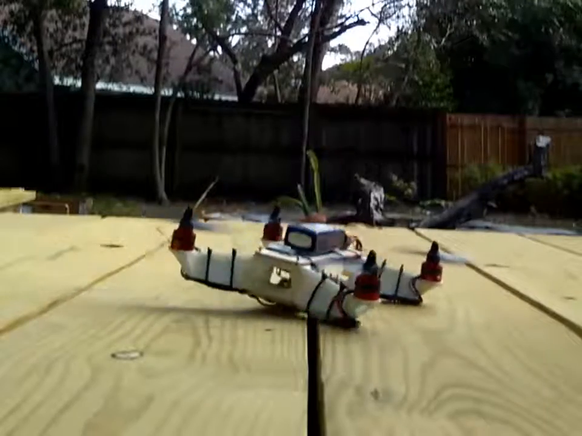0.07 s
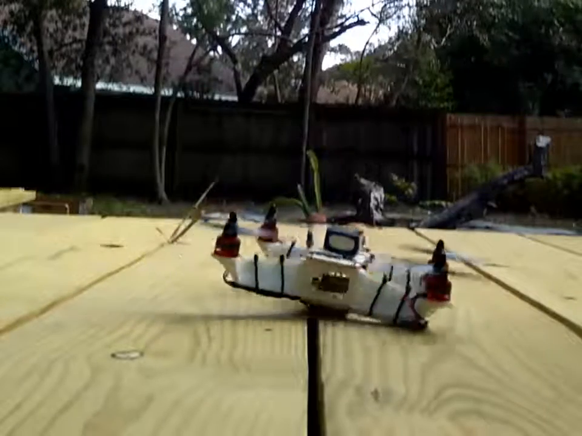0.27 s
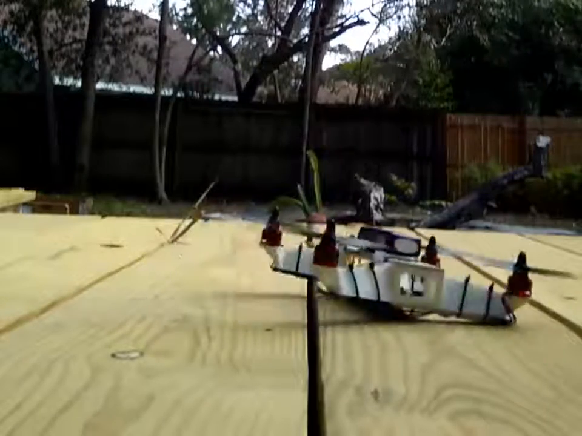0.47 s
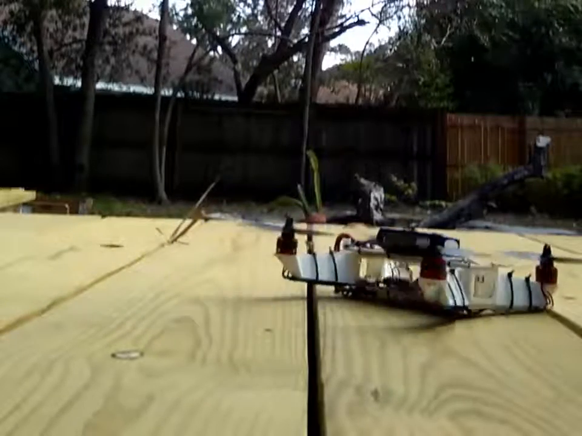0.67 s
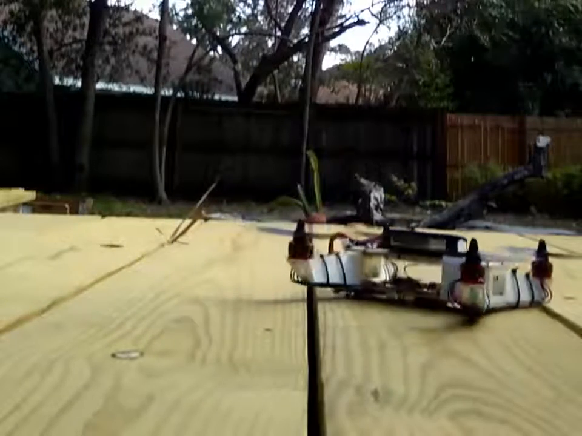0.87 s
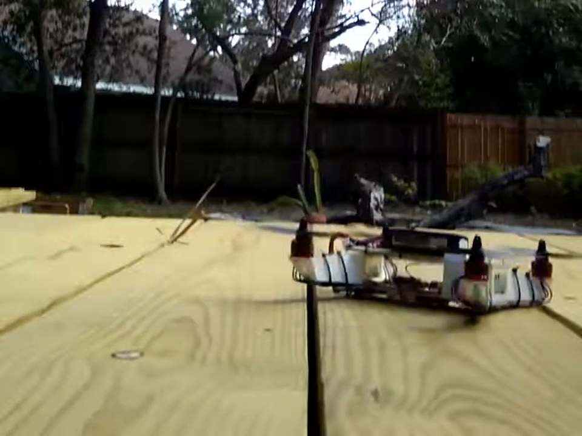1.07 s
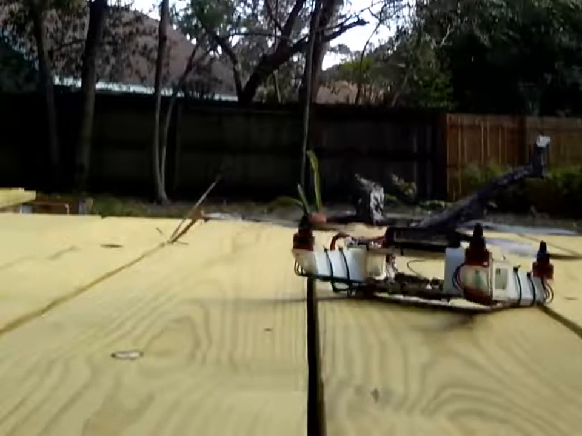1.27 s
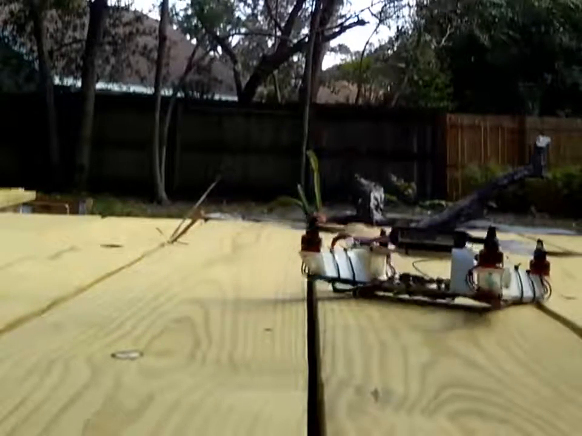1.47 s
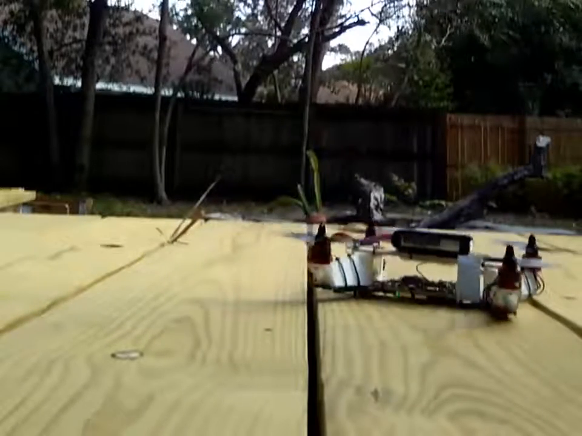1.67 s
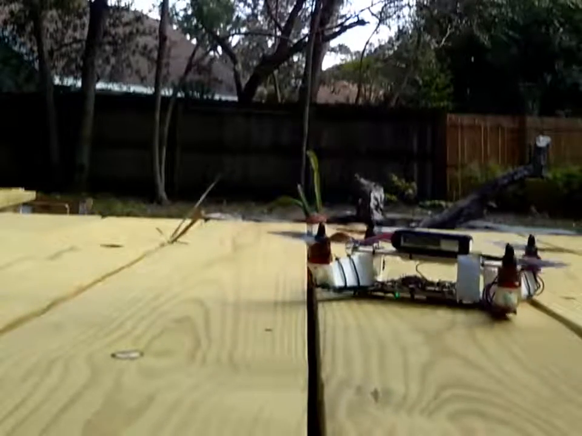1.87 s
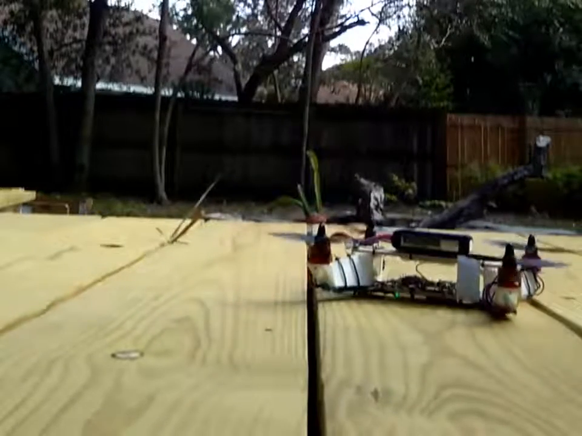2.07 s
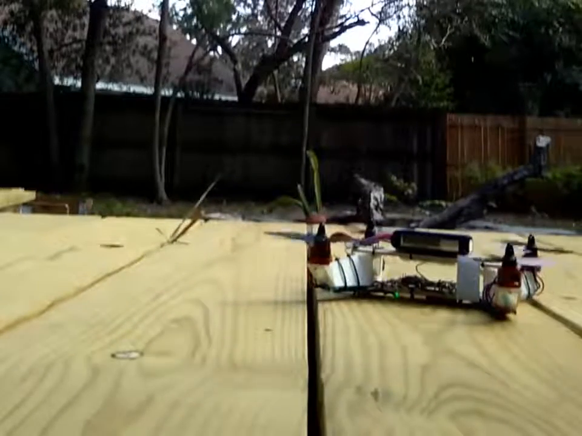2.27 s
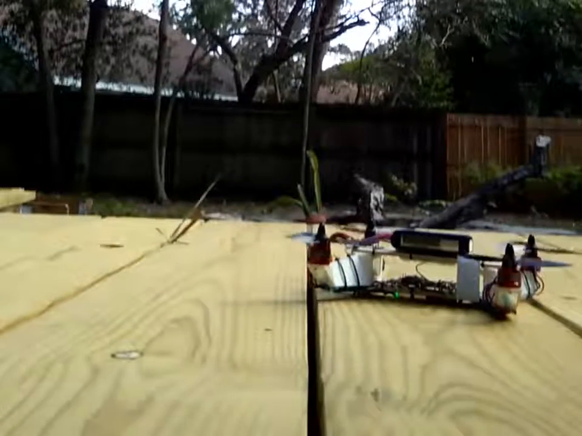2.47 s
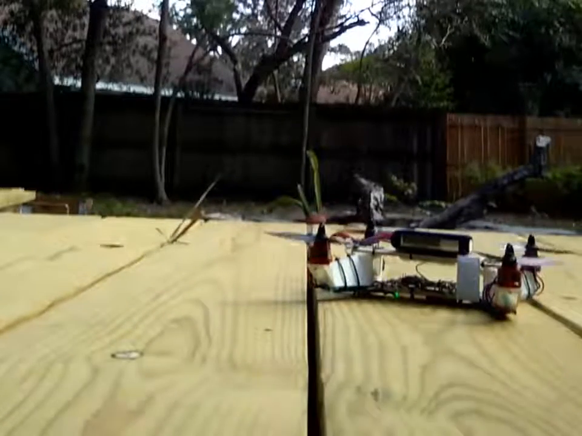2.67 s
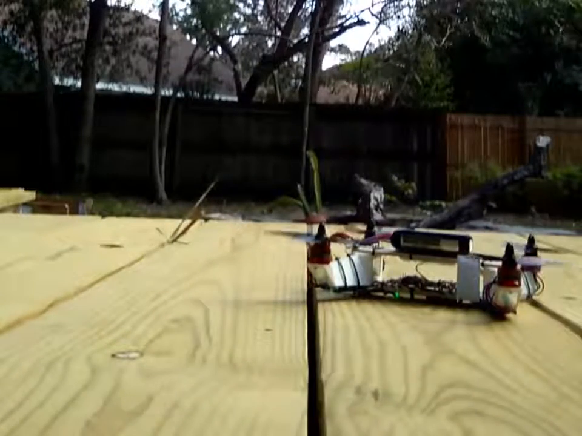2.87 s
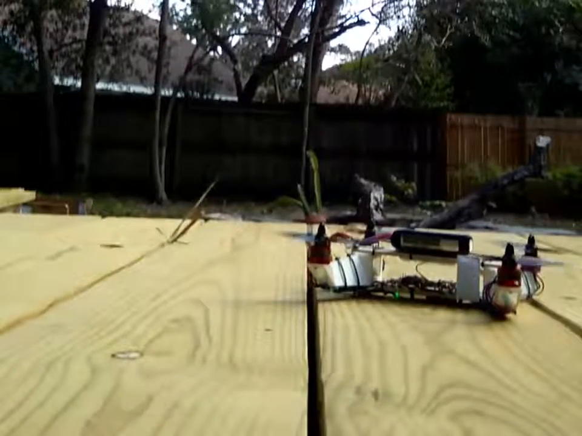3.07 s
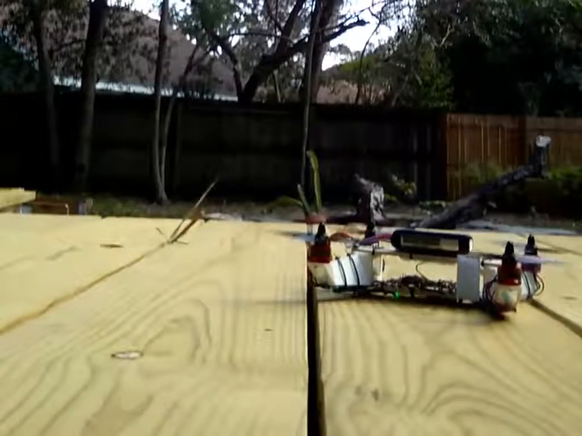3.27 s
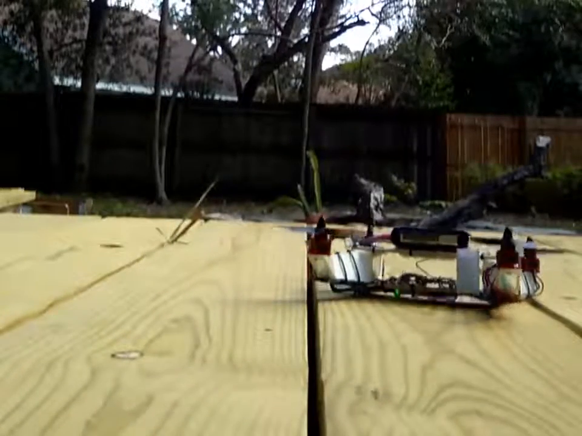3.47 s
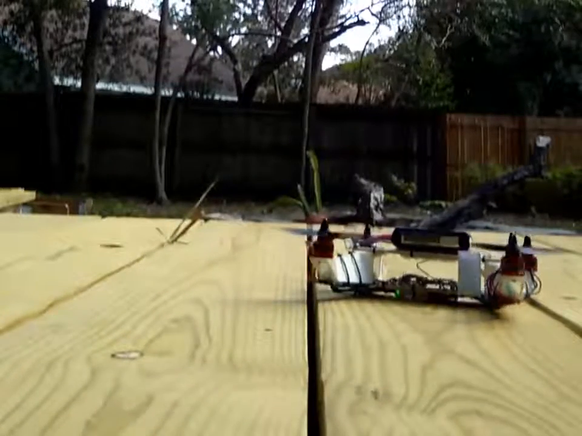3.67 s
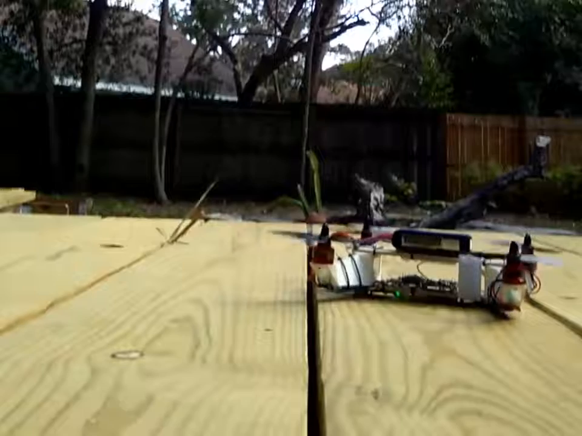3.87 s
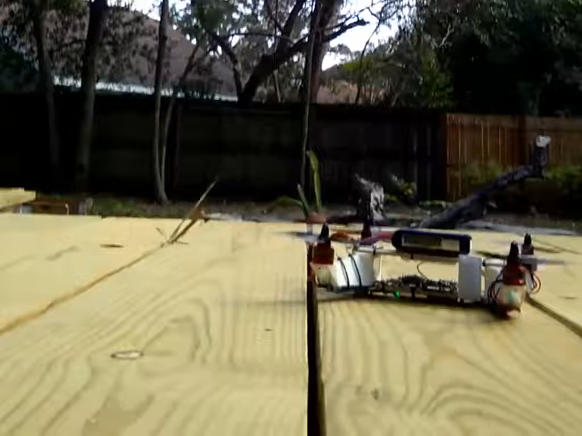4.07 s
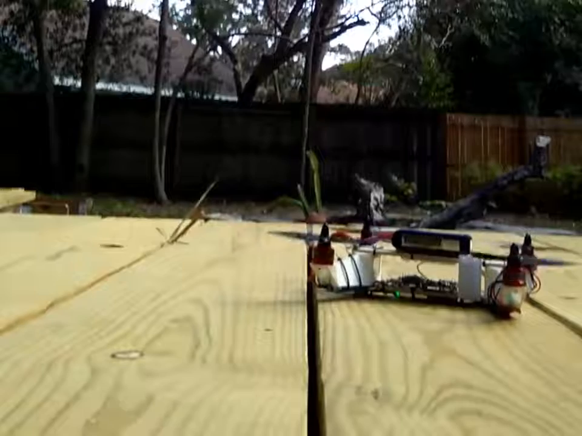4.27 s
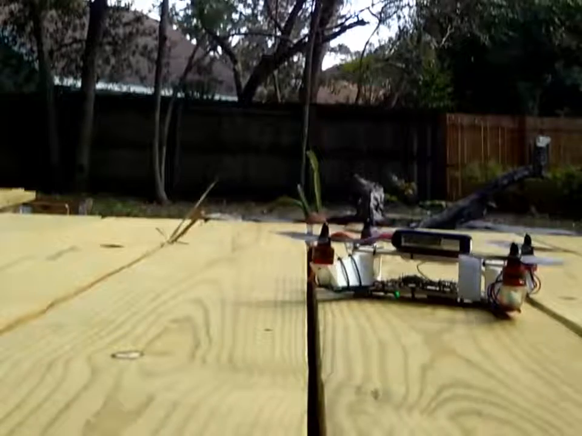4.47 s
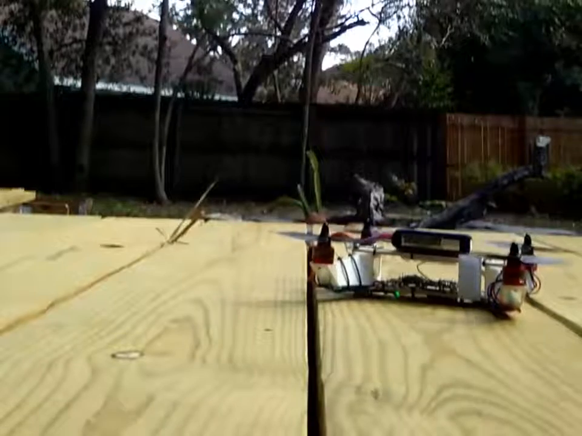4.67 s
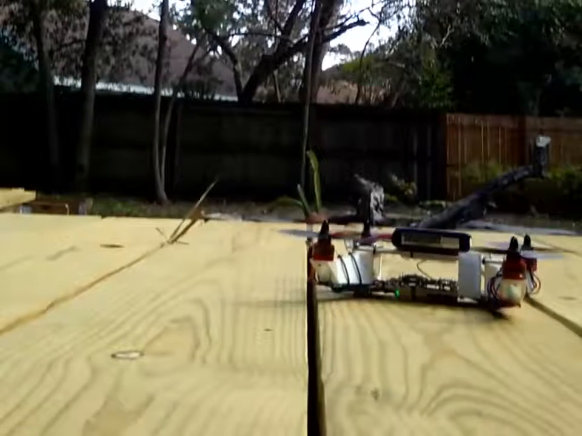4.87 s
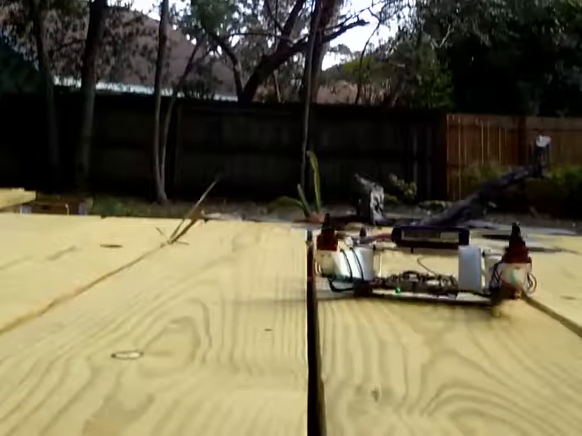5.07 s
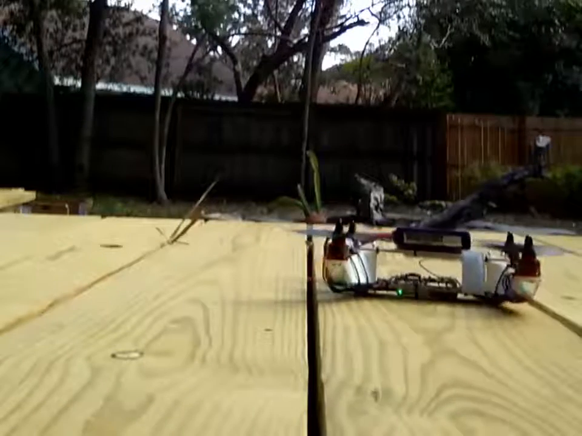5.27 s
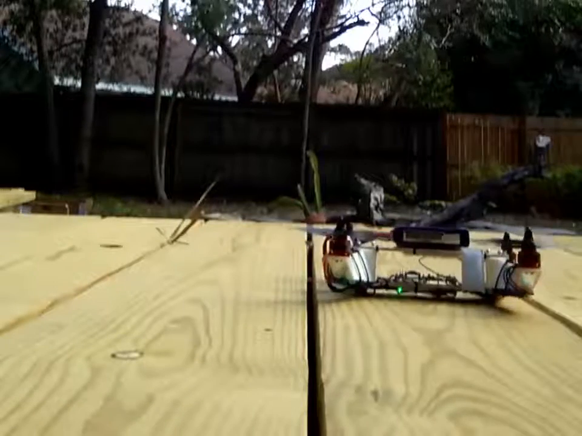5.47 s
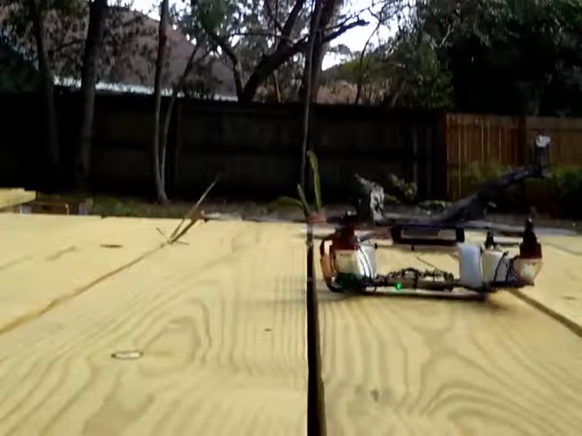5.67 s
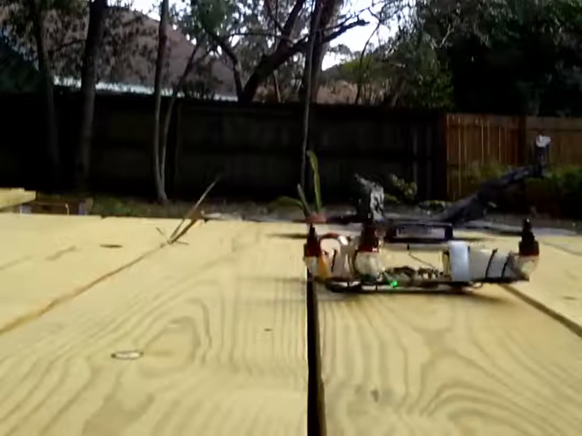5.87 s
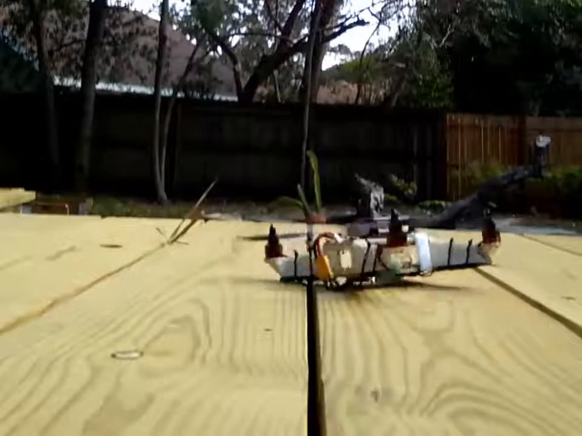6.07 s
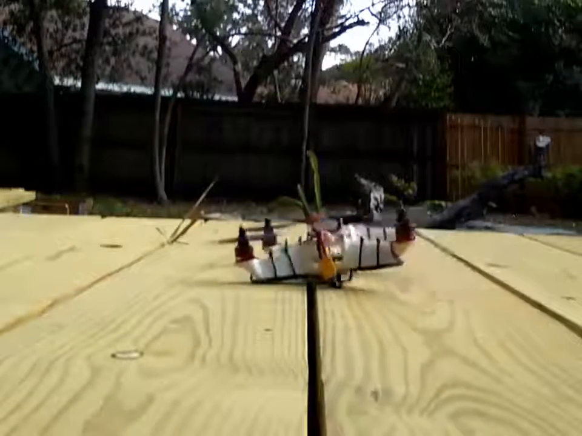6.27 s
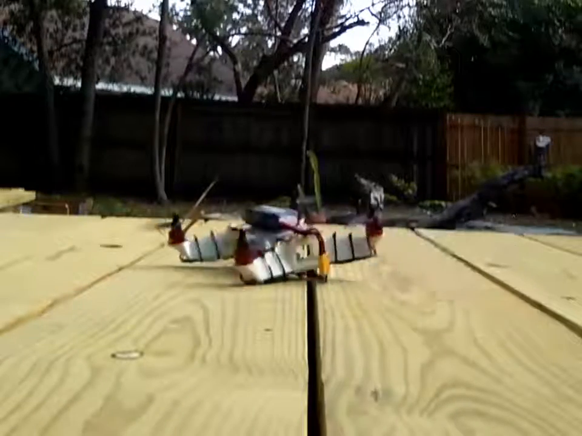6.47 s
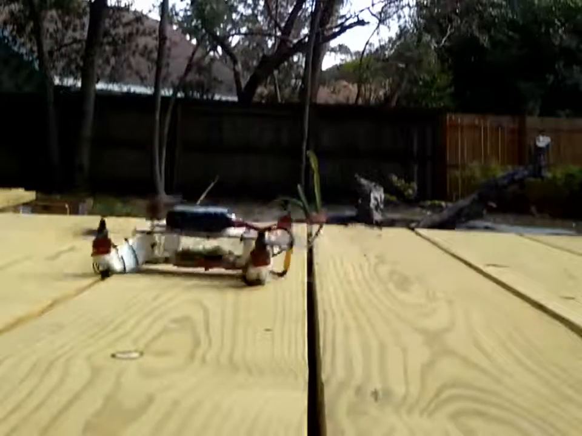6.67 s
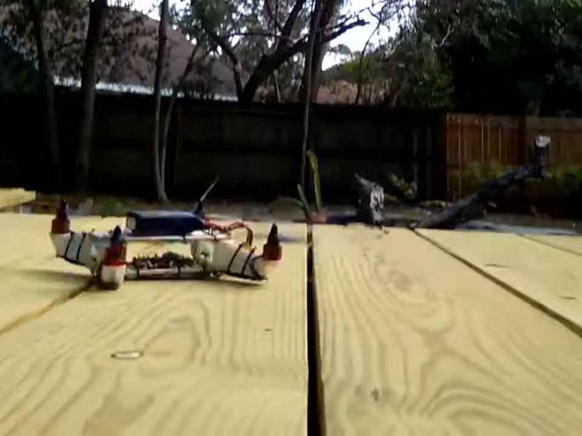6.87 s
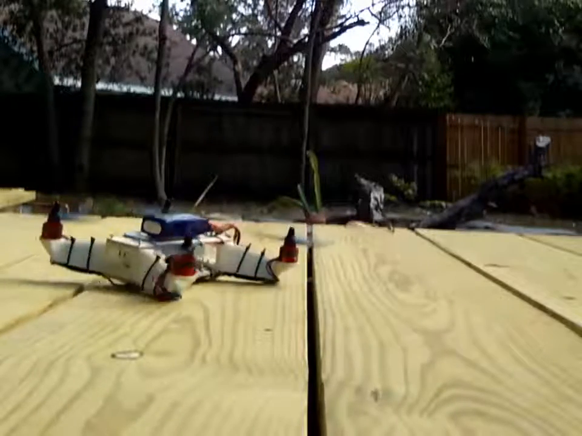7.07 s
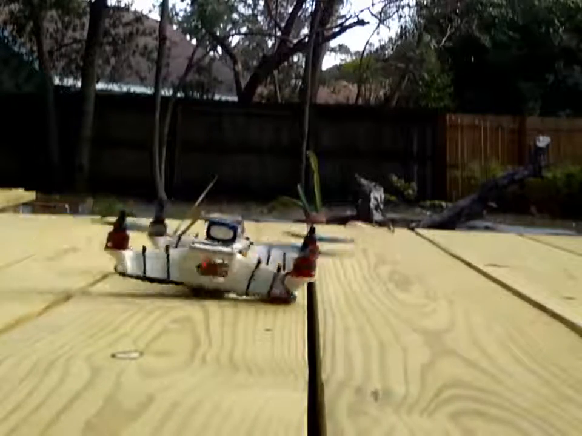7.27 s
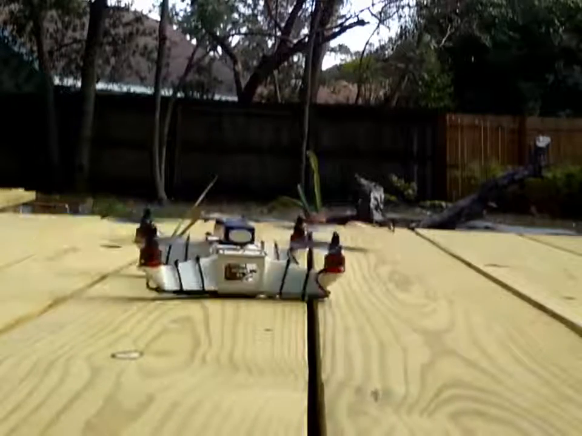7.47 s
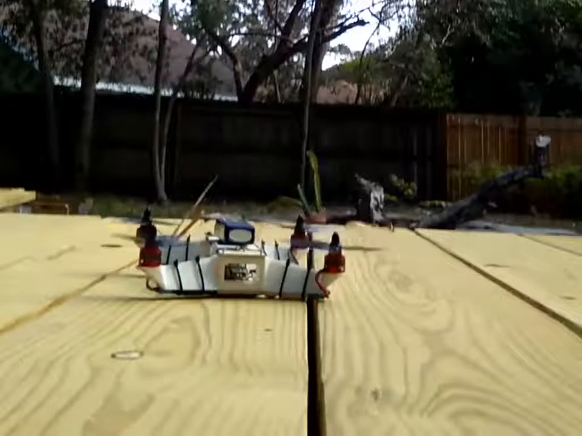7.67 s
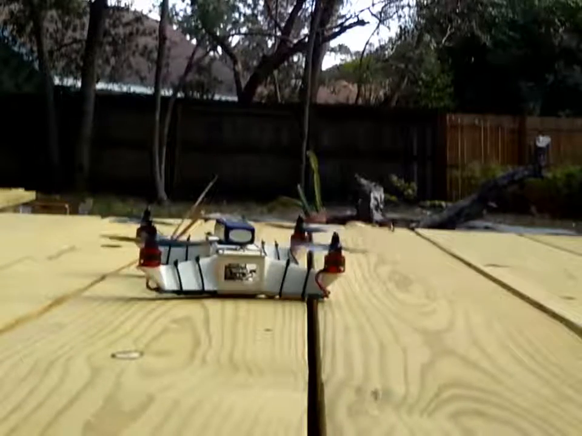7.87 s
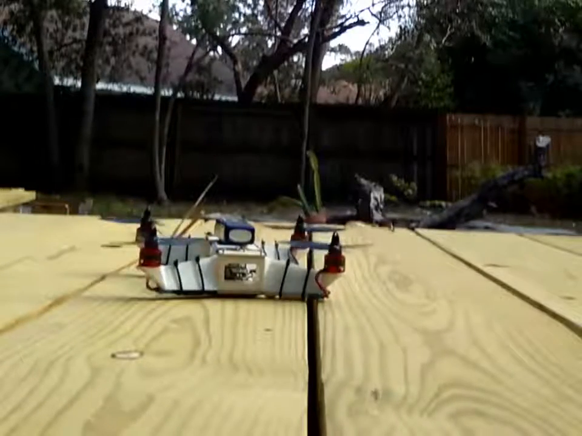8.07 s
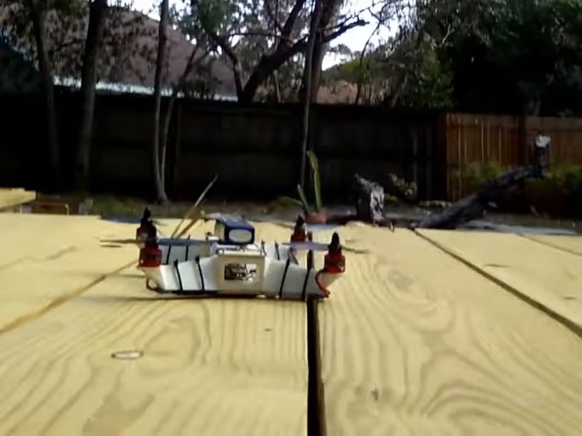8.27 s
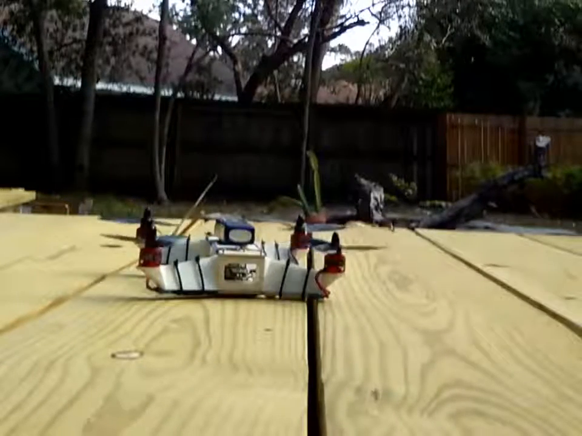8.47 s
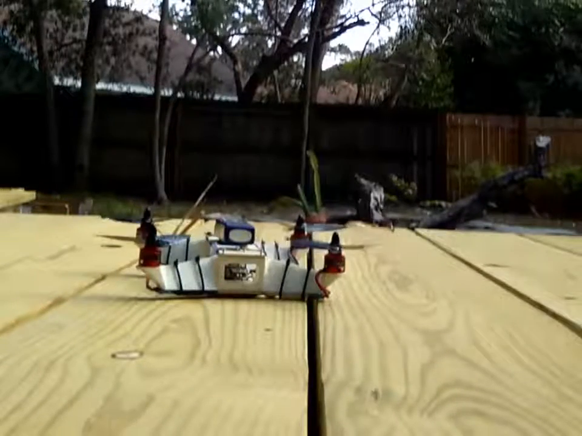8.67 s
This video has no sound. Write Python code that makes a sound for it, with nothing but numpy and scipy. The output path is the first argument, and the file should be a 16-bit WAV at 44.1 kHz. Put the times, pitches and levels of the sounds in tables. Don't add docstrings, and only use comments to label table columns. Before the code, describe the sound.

A phone about a metre away, in wide stereo, catches four little motors with beating propellers. A rough hum with wavering high whines falls away, a far plane drones low, then a piercing squeal precedes a short restart. A longer rev follows, rising in steps to its brightest pitch, with downwash buffeting and a sudden cluster of thumps that briefly dips the level. Power cuts, blades coast with thin falling whirrs, and soft outdoor hiss remains.

```python
import sys
import numpy as np
from scipy import signal
from scipy.fft import rfft, irfft, next_fast_len
from scipy.io import wavfile
from scipy.ndimage import uniform_filter1d

SR = 44100
rng = np.random.default_rng(int(sys.argv[2]) if len(sys.argv) > 2 else 0)


def invert_db(x):
    u = np.asarray(x, float) / 20
    return 10 ** u


def generate_wav(sig):
    pcm = np.round(np.clip(np.atleast_2d(sig).T, -1, 1) * 32767).astype(np.int16)
    wavfile.write(sys.argv[1], SR, pcm)


N = 384534
T = np.arange(N) / SR
COAST_S = 0.52

# from t/s, to t/s
RUNS = [
    (0, 1.85),
    (2.9, 3.9),
    (4.3, 7.45),
]
# f/Hz, level per Hz/dB
HISS = [(2400, 2.5), (3200, -.5), (3700, -1), (4300, -1.5), (5200, -3), (5800, -1), (6500, -3), (7600, -18),
        (8200, -18)]


def curve(rows):
    s, *columns = np.transpose(rows)
    return [np.interp(T, s, column) for column in columns]


def walk(rate):
    hold = int(SR / rate)
    steps = np.repeat(rng.standard_normal(N // hold + 1), hold)
    return 1.336 * uniform_filter1d(uniform_filter1d(steps, hold), hold)[:N]


def tone(hz):
    return np.sqrt(2) * np.sin(2 * np.pi * (np.cumsum(hz) / SR + rng.random()))


def gate(spans):
    steps = sum(invert_db(db) * ((T > a) & (T < b)) for a, b, db in spans)
    return uniform_filter1d(steps, SR // 25)


def ports(x, lag):
    return np.array([x, np.roll(x, lag)])


def noise(shape, flicker_db, alike_hz=2400.0):
    size = next_fast_len(N)
    hz = np.maximum(np.arange(size // 2 + 1) * SR / size, 1)
    f, db = np.transpose(shape)
    gain = invert_db(np.interp(np.log(hz), np.log(f), db, left=-80, right=-80))
    mid, side = rfft(rng.standard_normal((2, size))) * gain
    side = side * np.minimum(hz / alike_hz, 1) ** 1.09
    pair = np.array([mid + side, mid - side])
    out = 0
    for centre in np.arange(np.log2(f[0]), np.log2(f[-1]) + 1):
        band = np.cos(np.pi / 2 * np.clip(np.log2(hz) - centre, -1, 1)) ** 2
        out = out + invert_db(flicker_db * walk(12)) * irfft(band * pair, size)[:, :N]
    return out / np.sqrt(np.mean(out ** 2))


def speeds():
    # t/s, fast pair f/Hz, slow pair f/Hz
    bursts = [
        [(0, 420, 378), (.5, 420, 390), (.62, 390, 355), (.78, 360, 322), (1.08, 378, 331), (1.38, 396, 358),
         (1.47, 396, 345), (1.55, 370, 332), (1.85, 240, 200)],
        [(2.72, 70, 60), (2.9, 170, 150), (3.1, 215, 200), (3.2, 260, 240), (3.33, 345, 322), (3.46, 390, 343),
         (3.63, 370, 325), (3.72, 320, 260), (3.9, 220, 180)],
        [(4.3, 160, 140), (4.45, 205, 190), (4.56, 245, 225), (4.75, 300, 262), (4.84, 340, 320),
         (4.95, 375, 345), (5.05, 398, 358), (5.15, 385, 345), (5.22, 368, 322), (5.3, 365, 325),
         (5.4, 382, 360)],
        [(5.4, 382, 360), (5.55, 410, 380), (5.7, 430, 391), (6, 430, 395), (6.5, 450, 412), (6.85, 430, 405),
         (7.21, 428, 390), (7.26, 395, 350), (7.33, 300, 270), (7.45, 230, 212)],
    ]
    each = []
    for burst in bursts:
        started = T >= burst[0][0]
        drag = np.exp(-np.maximum(T - burst[-1][0], 0) / COAST_S)
        each.append(np.array(curve(burst)) * started * drag)
    return np.maximum(np.max(each, axis=0), 20)


def frame(hz):
    # f/Hz, width/Hz, level/dB
    modes = [(655, 90, 16.5), (790, 50, 1), (885, 50, 2), (1040, 120, 6), (1300, 90, 2), (3620, 200, 3),
             (4150, 300, 3), (7250, 500, 14)]
    return 1 + sum(invert_db(db) / (1 + ((hz - f) / w * 2) ** 2) for f, w, db in modes)


def rotor(pitch, gain, lag, switch_db):
    # f/Hz, level/dB
    deck = [(180, 7), (270, 5), (325, -4), (355, -1), (385, 2), (450, 2.5)]
    # multiple of blade rate, level/dB
    orders_db = [(.5, -17), (2, -12), (2.5, -17), (3, -12), (3.5, -15), (4, -9), (4.5, -11), (5, -9),
                 (6, -14), (7, -15), (8.5, -18), (9, -18), (10.5, -19), (21, -32)]
    # t/s, octave level/dB
    uneven_db = [(0, -2), (.2, 0), (.6, 0), (.68, -5), (.84, -6), (.88, 1), (1.12, 0), (1.2, -3), (1.4, -2),
                 (1.55, -1), (3.3, 0), (3.64, 0), (3.69, -9), (4.55, 5), (4.76, 0), (4.8, -5), (4.84, 1),
                 (5.05, 0), (5.15, 3), (5.35, 3), (5.5, 1), (6.1, 0), (6.3, -1), (6.9, -3), (7.22, 0)]
    upper_switch_hz = 16250

    hz = pitch * (1 + 0.002 * walk(20) + 0.005 * walk(7))
    hum = invert_db(1.8 * walk(12) + np.interp(hz, *np.transpose(deck))) * tone(hz)
    driving = 0.35 + gate([(a - 0.1, b - 0.19, -3.7) for a, b in RUNS])
    for k, db in orders_db:
        rough = driving * (0.68 + 0.17 * min(k, 3) * walk(min(50 * k, 160)))
        level = invert_db(db + (k == 2) * curve(uneven_db)[0]) * (hz / 400) ** 1.5
        smear_hz = (14 if k < 8 else 5) * walk(55)
        hum = hum + level * rough * frame(k * hz) * tone(k * hz + smear_hz)

    running = gate([(a + 0.03, b - 0.25, switch_db) for a, b in RUNS + [(2.77, 3.17)]])
    switch_hz = np.minimum(upper_switch_hz + 60 - 5.5 * hz + 25 * walk(60), 15500)
    switch = running * np.minimum(hz / 300, 1) * invert_db(3 * walk(12)) * tone(switch_hz)
    switch = switch + 0.3 * running * tone(upper_switch_hz - 8 * hz + 30 * walk(60))
    beat = 1 + 0.11 * tone(hz)
    return ports(gain * hum + switch, lag), beat


def left_motor():
    # t/s, f/Hz
    left_hz = [(0, 287), (.5, 286), (.65, 265), (4.15, 280), (4.45, 288), (4.62, 278), (4.82, 300),
               (6.15, 392), (6.4, 388), (6.9, 378), (7.2, 380), (7.3, 330)]
    # t/s, level/dB
    left_db = [(0, -46), (.35, -41), (.55, -43), (.66, -70), (4.15, -70), (4.22, -50), (4.45, -52),
               (4.52, -68), (4.6, -52), (4.64, -42), (4.8, -46), (4.86, -70), (6.1, -70), (6.2, -50),
               (6.5, -41), (6.9, -45), (7.2, -47), (7.3, -73)]
    return rotor(curve(left_hz)[0], invert_db(curve(left_db)[0] - 1), lag=2.5, switch_db=-90)[0]


def whine(hz, spans, lag):
    level = gate(spans) * invert_db(3.5 * walk(35))
    return ports(level * tone(hz * (1 + 0.001 * walk(30)) + 13 * walk(45)), lag)


def bells(slow):
    # from t/s, to t/s,
    # from f/Hz, to f/Hz, level/dB
    upper = [(-.1, .55, 7770, 7750, -49), (.28, .5, 7310, 7370, -45), (1.15, 1.47, 7100, 6920, -47),
             (4.95, 5.12, 6930, 7060, -45), (5.55, 5.8, 7030, 7340, -41), (5.8, 6.35, 7340, 7560, -42),
             (6.35, 6.65, 6720, 6690, -45), (6.65, 6.88, 7170, 7030, -40), (6.75, 7.2, 6720, 6650, -48),
             (6.88, 7.25, 7540, 7370, -40), (6.9, 7.24, 7100, 7140, -44), (6.6, 7.1, 14650, 14700, -63),
             (6.65, 7.25, 13400, 13350, -64)]
    # from t/s, to t/s, from f/Hz, to f/Hz, level/dB
    lower = [(-.1, .42, 3390, 3370, -45), (-.1, .3, 3610, 3540, -46), (.2, .3, 4010, 3970, -45),
             (.3, .52, 3990, 4030, -45), (.78, .95, 3890, 3970, -47), (.95, 1.28, 3560, 3650, -46),
             (1.35, 1.46, 3940, 3930, -46), (3.2, 3.3, 3900, 4100, -49), (3.22, 3.4, 3560, 3600, -49),
             (3.3, 3.5, 4250, 4200, -49), (3.38, 3.6, 3640, 3600, -45), (4.42, 4.52, 3900, 4050, -55),
             (4.6, 4.72, 3700, 3800, -52), (4.77, 4.88, 4350, 4400, -49), (4.95, 5.05, 4000, 4030, -46),
             (5, 5.1, 1480, 1500, -44), (5, 5.15, 1050, 1080, -44), (5.2, 5.4, 3600, 3650, -47),
             (5.4, 5.47, 4000, 4050, -45), (5.45, 5.65, 3640, 3760, -45), (5.5, 5.72, 4190, 4260, -44),
             (5.72, 5.9, 4250, 4200, -44), (5.75, 5.95, 3700, 3730, -46), (5.9, 6.1, 4200, 4290, -43),
             (6.7, 6.85, 4050, 4030, -45), (6.88, 7.25, 3450, 3440, -46), (7, 7.2, 4060, 4160, -48),
             (7.05, 7.25, 3640, 3630, -44), (.1, .45, 1090, 1150, -45), (.7, 1.05, 1300, 1310, -46),
             (1.25, 1.45, 1450, 1500, -45), (5.55, 5.7, 1470, 1530, -42), (5.78, 5.9, 1560, 1540, -44),
             (5.62, 5.72, 1950, 1900, -45), (5.5, 5.75, 1110, 1150, -43), (5.7, 5.85, 1700, 1710, -44)]
    # from t/s, to t/s, level/dB
    slow_spans = [
        (.88, 1.55, -47),
        (3.35, 3.62, -48),
    ]
    # from t/s, to t/s, level/dB
    stall = [
        (2.92, 3.02, -46),
    ]

    out = whine(21 * slow, slow_spans, lag=1)
    out = out + whine(7400 + 60 * walk(90), stall, lag=1)
    for k, (a, b, from_hz, to_hz, db) in enumerate(upper + lower):
        glide = np.interp(T, (a, b), (from_hz, to_hz))
        out = out + whine(glide, [(a, b, db - (from_hz < 5000))], lag=1 - 3 * (k % 2))
    return out


def air(beat, db, push, octaves):
    # f/Hz, level per Hz/dB
    rush_shape = [(200, 7), (400, 4), (560, -3.5), (800, -2), (950, -7), (1100, 0), (1250, 1.5), (1350, 0),
                  (1560, 0), (1700, 0), (1900, 1), (2200, 0.5), (2800, -12)]
    # f/Hz, level per Hz/dB
    top_shape = [(7600, 2), (8400, -2), (10000, -2.5), (12000, -11), (13200, -12), (14400, -13),
                 (15500, -16.5)]

    rush = invert_db(-2.8) * noise(rush_shape, 0.86)
    rush = rush + invert_db(0.59 * push + 0.36 * octaves) * noise(HISS, 0.73)
    rush = rush + invert_db(-8.5 + 0.97 * push + 3 * octaves) * noise(top_shape, 0.53)
    driven = 0.3 + gate([(a - 0.05, b - 0.2, -3) for a, b in RUNS])
    bell_noise = noise([(6700, -4), (7100, 1.5), (7600, 4), (8000, -22)], 2.6)
    return invert_db(db) * (beat * rush + driven * invert_db(-6.5 + 1.6 * push) * bell_noise)


def wind():
    # t/s, level/dB
    breeze = [(0, -42.5), (1.5, -41.5), (2, -44), (3.3, -48), (4, -42), (8.3, -42.5), (8.45, -52)]
    # t/s, peak level/dB, half length/s
    gust_rows = [(.5, -38, .07), (.88, -44, .07), (1.1, -42, .06), (1.37, -44, .08), (1.93, -49, 0.11),
                 (6.101, -22, 0.1), (6.312, -30, 0.13), (6.545, -26, 0.15), (7.5, -40, 0.066),
                 (7.806, -45, 0.049), (8.124, -44.5, 0.055)]
    # t/s, peak level/dB, f/Hz, length/cycles
    slaps = [
        (6.0857, -8, 270, 1.8),
        (6.0905, -13, 380, 2.2),
        (6.0972, -14, 150, 1.3),
        (6.1034, -1, 240, 1.1),
        (6.1037, -12, 970, 1.8),
        (6.1062, -4.5, 370, 1.4),
        (6.1165, -12, 220, 1.2),
    ]

    gusts = sum(invert_db(peak_db) * np.exp(-((T - s) / half) ** 2) for s, peak_db, half in gust_rows)
    db = 20 * np.log10(invert_db(curve(breeze)[0]) + gusts)
    low = noise([(12, -6), (25, 0), (60, -6), (120, -18), (200, -30)], 3.5, 1.5)
    high = noise([(100, 9), (140, 8.5), (260, -9), (600, -24)], 5.8, 1.5)
    out = invert_db(1.04 * db) * (low + invert_db(-10 + 0.53 * (db + 38.5)) * high)
    for s, peak_db, hz, cycles in slaps:
        swell = np.exp(-((T - s) * hz / cycles) ** 2 * 4)
        out[0] -= invert_db(peak_db) * np.cos(2 * np.pi * hz * (T - s)) * swell
    return out


def plane():
    # t/s, f/Hz
    firing_hz = [(0, 88.24), (2.7, 87.37), (3.3, 81.4), (8.72, 79.3)]
    # t/s, level/dB, share of the second harmonic/dB
    passing = [(0, -54, -4), (.39, -49.5, 4.5), (1.02, -45.5, 1), (1.97, -42, 2.5), (2.48, -46.5, 10.5),
               (2.81, -53, 7), (3.3, -51, 0.5), (4.05, -58.5, 5), (4.95, -54.5, 7.5), (5.9, -54.5, 1.5),
               (7.19, -48.5, 2), (7.45, -62, 14.5), (8.72, -73, -3)]

    firing_db, share_db = curve(passing)
    octave_db = firing_db + share_db
    hz = curve(firing_hz)[0] * (1 + 0.00449 * walk(6.6))
    drone = invert_db(firing_db + 12.5 + 0.84 * walk(8.2)) * tone(hz)
    drone = drone + invert_db(octave_db + 7 + 2.2 * walk(13)) * tone(2 * hz)
    drone = drone + invert_db(firing_db + 7.5 + 2.5 * walk(8.8)) * tone(1.39 * hz) * (T < 2.7)
    rumble_shape = [(45, 14), (100, 10), (200, 3.5), (290, 0), (450, -6), (800, -14), (1300, -25.5)]
    rumble = invert_db(-34.5 + 0.58 * (firing_db + 48.5)) * noise(rumble_shape, 0.99)
    return ports(drone, 1) + rumble


def garden():
    # f/Hz, level per Hz/dB
    hiss_shape = [(18, 9), (40, 17.5), (100, 12.5), (250, -8.5), (600, -3.5), (800, -4), (1100, -5.5),
                  (1600, -8.5), (2400, -13.5), (4000, -20.5), (6500, -20.5), (9000, -28), (15500, -31.5)]
    # t/s, peak level/dB, f/Hz, ring/s
    ticks = [
        (2.196, -44, 4990, .03),
        (2.279, -44, 4014, .02),
        (2.475, -43.5, 4508, 0.13),
        (2.5, -47, 6000, 0.099),
        (8.447, -40, 1490, .06),
    ]

    out = invert_db(-42.5) * noise(hiss_shape, 0.23)
    hollow = noise([(250, -16), (280, 0), (300, 0), (330, -16)], 3.5, 150.0)
    out = out + invert_db(-62 + 4 * walk(3)) * hollow
    length = SR // 5
    for s, db, centre_hz, ring in ticks:
        b, a = signal.iirpeak(centre_hz, 0.8, SR)
        grain = signal.lfilter(b, a, rng.standard_normal((2, length)))
        decay = np.exp(-np.log(1000) * T[:length] / ring)
        start = int(s * SR)
        out[:, start:start + length] += invert_db(db) * grain * decay
    return out


def restart():
    # t/s, level/dB
    squeal_db = [
        (2.702, -58),
        (2.712, -46),
        (2.74, -42),
        (2.8, -31.5),
        (2.84, -31),
        (2.858, -37),
        (2.878, -31.5),
        (2.9, -38),
        (2.925, -52),
    ]
    switch_hz = 8022
    db = curve(squeal_db)[0]
    current_hz = np.clip((T - 2.733) * 5850, 0, 960)

    squeal = tone(switch_hz + 0 * current_hz)
    squeal = squeal + invert_db(-23 + 4.5 * walk(80)) * tone(switch_hz + 3 * current_hz)
    for share, up_db in ((0.83, -18), (0.61, -11), (0.96, -16)):
        low_hz = switch_hz - share * current_hz
        squeal = squeal + invert_db(-5.5 + 2.5 * walk(110)) * frame(low_hz) * tone(low_hz)
        squeal = squeal + invert_db(up_db) * tone(switch_hz + share * current_hz)

    fizz_shape = [(6600, -12), (7000, 0), (7800, -2), (8300, -14), (10500, -22), (12000, -36)]
    fizz = invert_db(-8) * noise(fizz_shape, 3)
    stir = invert_db(-58 + current_hz / 75) * noise(HISS, 1.5) * (T > 2.72) * (T < 2.925)
    puff = np.exp(-((T - 2.9) / np.where(T < 2.9, 0.012, 0.025)) ** 2)
    catch = invert_db(-39.5) * puff * noise([(8000, 0), (11000, -7), (15500, -14)], 1)
    on = invert_db(db) * (T > 2.702) * (T < 2.925)
    return ports(on * squeal, -4) * invert_db(np.array([[1.5], [-1.5]])) + on * fizz + stir + catch


def coast():
    # multiple of blade rate, from t/s, to t/s, level/dB
    lines = [
        (7.7, 7.34, 7.41, -2),
        (7, 7.44, 7.6, -2),
        (9, 7.45, 7.56, 0),
        (10.6, 7.5, 7.59, 4),
        (10.4, 7.59, 7.66, 3),
        (10.5, 7.67, 7.8, -2.5),
        (8.2, 7.6, 7.74, -6),
        (10.3, 7.8, 7.85, -5),
    ]
    hz = np.minimum(275 * np.exp(-(T - 7.35) / COAST_S), 400)
    out = 0
    for k, a, b, db in lines:
        level = gate([(a, b, db - 56.5)]) * invert_db(1.8 * walk(25))
        out = out + level * frame(k * hz) * tone(k * hz + 7 * walk(40))
    return ports(out, 1)


def scene():
    # t/s, level/dB, hum level/dB
    load = [(.1, 0.5, 4), (.52, 0, 3), (.62, 0, 6), (.8, 0, 3), (1.25, 0.5, 4), (1.56, 1.5, 3.5),
            (1.9, -2, -3), (2.9, 7, -4), (3.1, 2, 0), (3.22, 3, 1), (3.3, -1, 1.5), (3.45, 1.5, 3),
            (3.65, 0, 1), (3.9, -2, 0), (4.4, 1, 0), (4.6, 1, 1.5), (4.8, -2, 4), (4.95, 1.5, 2.5),
            (5.1, 1, 2), (5.25, 1, -2), (5.45, -0.5, 3), (5.6, -1, 3), (6.1, -1, 2), (6.5, 0, 3),
            (6.8, 0, 2), (6.9, 0, -2), (7, .5, 1), (7.2, 1, 0), (7.33, 4, -3), (7.5, 2.5, -3)]
    # t/s, level/dB
    front_db = [(0, -1.5), (.5, 1), (.64, -1), (.75, -4), (1, -5), (1.4, -2), (3, -4), (3.5, -6), (4.6, -6),
                (5.1, -7), (5.3, -5), (5.6, -5), (5.75, -1), (5.85, -8), (6.05, -7), (6.3, -2), (6.55, 0.5),
                (6.9, -4), (7.1, 1), (7.3, 0.5)]

    fast, slow = speeds()
    octaves = uniform_filter1d(np.log2((fast + slow) / 800), SR // 20)
    push = np.clip(uniform_filter1d(np.gradient(octaves) * SR, SR // 12), -3, 2)
    load_db, hum_db = curve(load)
    over_db = 16 * octaves + load_db
    air_db = -31.5 + over_db
    powered = gate([(a - 0.05, b + 0.066, -3.5) for a, b in RUNS])
    hum = powered * invert_db(-36.8 + hum_db + 1.03 * over_db)

    front, front_beat = rotor(fast, hum * invert_db(curve(front_db)[0]), lag=5, switch_db=-63)
    rear, rear_beat = rotor(slow, hum, lag=-3, switch_db=-60.5)
    throb = 1 + 0.11 * tone(fast - slow)
    motors = front + rear + left_motor() + bells(slow)
    rush = air(front_beat * rear_beat * throb, air_db, push, octaves)
    return motors + rush + wind() + plane() + garden() + restart() + coast()


def low_pass(x):
    return signal.sosfilt(signal.butter(12, 15530, fs=SR, output="sos"), x)


def record(dry):
    size = next_fast_len(N)
    hz = np.arange(size // 2 + 1) * SR / size
    port_lag_s = 16.6 / SR
    dulled = 0.84 * hz ** 2 / (hz ** 2 + 11 ** 2) / (1 + (hz / 5500) ** 4)
    cross = dulled * np.exp(-2j * np.pi * hz * port_lag_s)
    wide = dry - irfft(rfft(dry[::-1], size) * cross, size)[:, :N]
    since = T - 6.108
    duck_db = -8 * np.clip(since / 0.012, 0, 1) * np.exp(-np.maximum(since, 0) / 0.78)
    mix = np.clip(wide * invert_db(duck_db), -0.98, 0.98)
    return low_pass(mix)


dry = scene()
out = record(dry)
generate_wav(out)
```